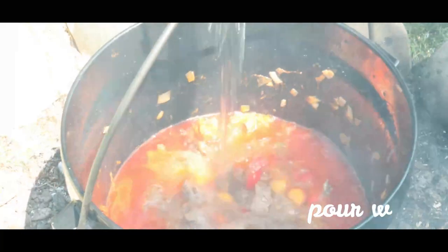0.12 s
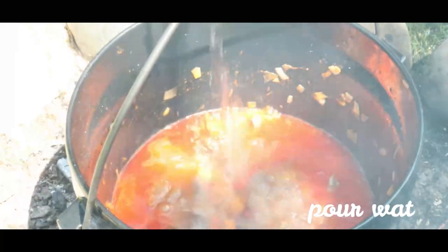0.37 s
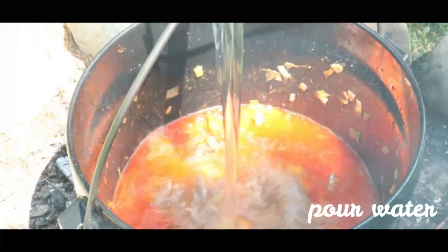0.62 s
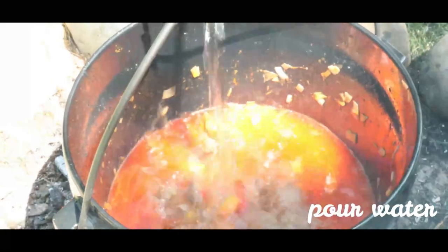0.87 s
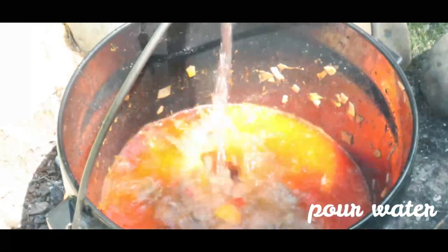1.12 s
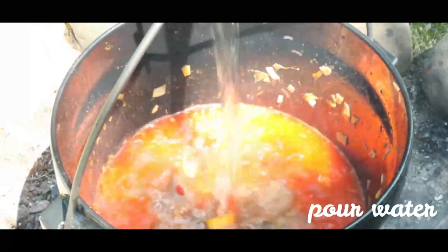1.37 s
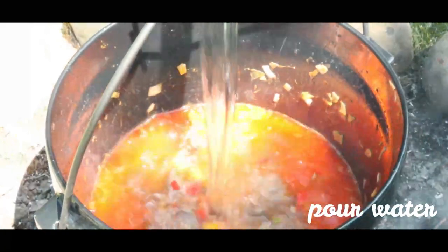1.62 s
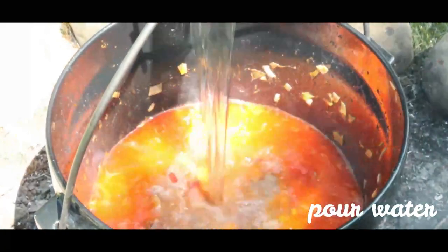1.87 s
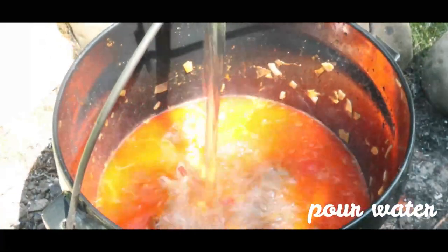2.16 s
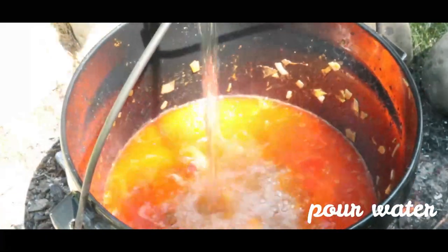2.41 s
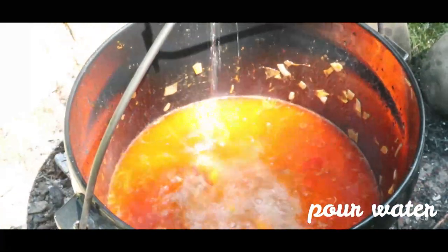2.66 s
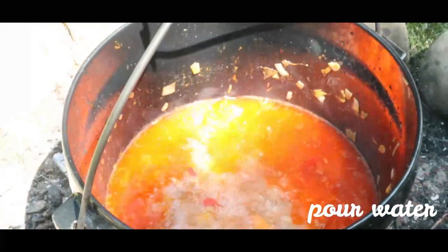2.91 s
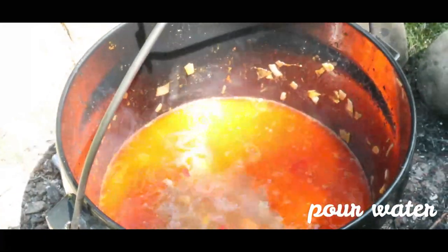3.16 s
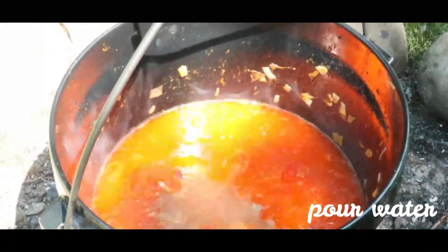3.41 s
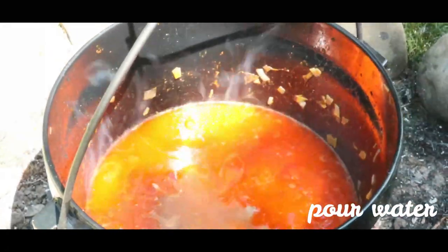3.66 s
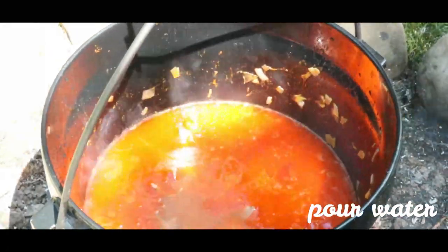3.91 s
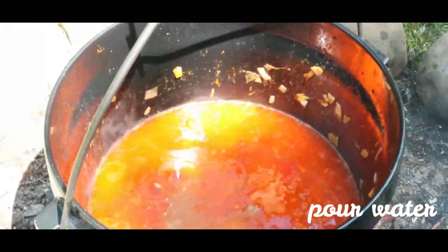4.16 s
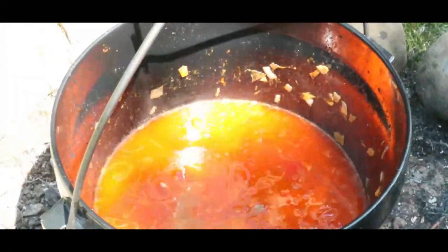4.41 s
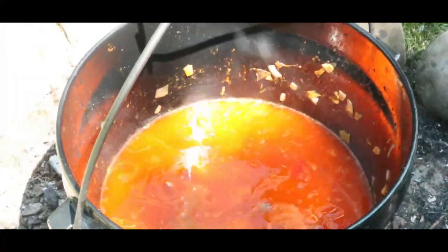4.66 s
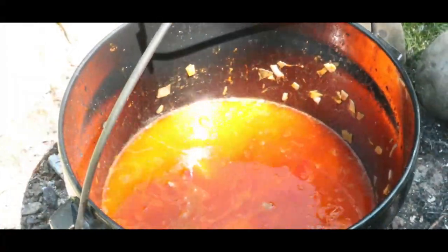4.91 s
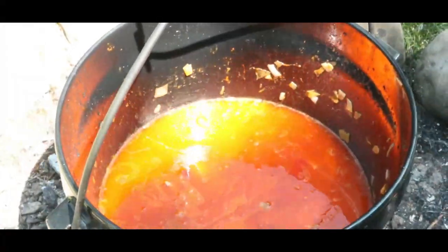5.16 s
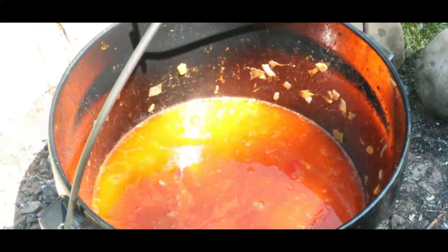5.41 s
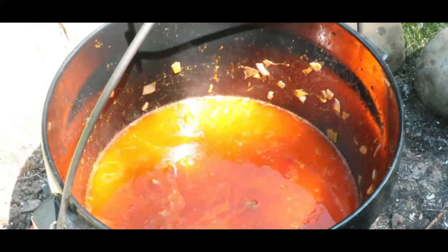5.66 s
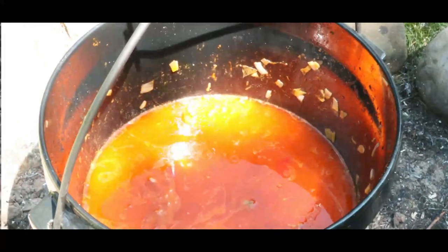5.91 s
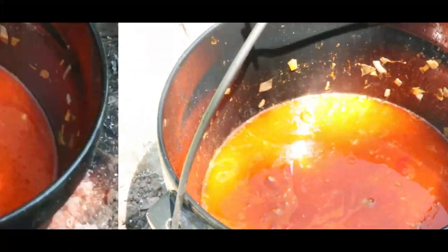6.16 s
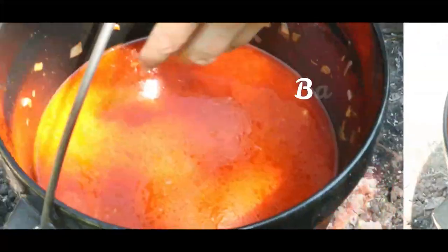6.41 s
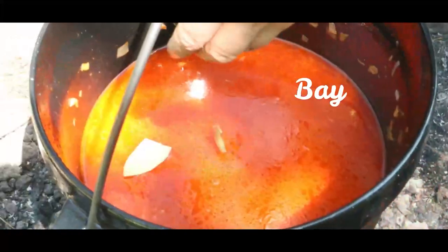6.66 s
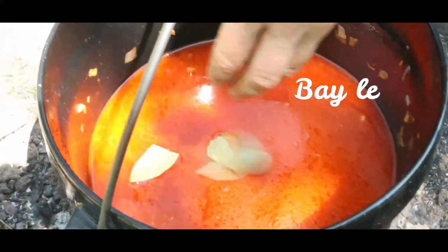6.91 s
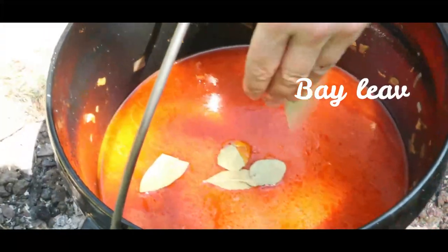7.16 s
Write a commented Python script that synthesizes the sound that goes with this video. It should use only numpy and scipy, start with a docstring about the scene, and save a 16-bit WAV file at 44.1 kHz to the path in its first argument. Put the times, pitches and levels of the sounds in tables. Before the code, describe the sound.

Close gurgling, splashing pour into a cauldron dwindles to drips by four seconds, followed by quiet open air with low wind and distant bird chirps.

```python
"""Water is poured into an iron pot outdoors, close by: an air pocket gulps, bubbles ring and spray ticks.
Deeper down, large bubbles glug and the pot hums; then the pour thins to drips. Rings are dying sines.
A noise suppressor shuts weak patches while the water runs, and the surroundings stay silent.
At 4.355 s they open up: coloured noise makes the wind and distant hum, gliding sines the small birds,
and a cloud of tiny rings a short rustle some way off."""
import sys
import numpy as np
from scipy import signal
from scipy.io import wavfile
from scipy.ndimage import uniform_filter1d

SR = 44100
rng = np.random.default_rng(int(sys.argv[2]) if len(sys.argv) > 2 else 0)


def level_to_linear(level):
    """Convert decibel levels to linear amplitude factors, elementwise."""
    exponent = np.asarray(level, float) / 20
    return 10 ** exponent


def generate_wav(sig):
    """Save sig (samples, or channels by samples) to the path in sys.argv[1] as 16-bit PCM at SR."""
    pcm = np.round(np.clip(np.atleast_2d(sig).T, -1, 1) * 32767).astype(np.int16)
    wavfile.write(sys.argv[1], SR, pcm)


N = 321930  # length in samples
AIR_OPENS_S = 4.355
HEAVE = 0.025  # rms share by which the heaving surface shifts the rings of the pot

# strength of the pour: [t/s, gulps level/dB, small bubbles level/dB, spray level/dB]
STREAM = [(0.16, -99, -100, -100), (0.24, -75, -81.5, -73), (0.5, -70.5, -68.5, -75.5),
          (0.56, -70.5, -62, -59.5), (0.74, -37, -42, -50), (0.83, -45.5, -53.5, -73),
          (0.95, -36.5, -46.5, -51), (1.09, -42.5, -57, -71.5), (1.33, -39, -54, -63.5),
          (1.42, -40.5, -55.5, -55), (1.63, -56, -52.5, -53.5), (1.92, -39.5, -53.5, -59),
          (2.19, -48, -61.5, -69), (2.38, -44, -55, -70), (2.62, -49.5, -66.5, -77),
          (2.95, -58.5, -62.5, -72), (3.2, -59, -64.5, -66.5), (3.4, -74, -85, -88), (3.6, -53.5, -74, -77),
          (3.76, -64.5, -89.5, -84.5), (3.95, -88, -90.5, -87.5), (4.08, -100, -105, -100)]
# moments when the stream breaks off: [t/s, length/s, level change/dB]
BREAKS = [(0.32, 0.046, -13), (0.4, 0.061, -11), (0.51, 0.031, -11.5), (1.71, 0.076, -20),
          (2.31, 0.05, -14), (2.68, 0.036, -8.5), (2.8, 0.096, -14), (2.94, 0.021, -13),
          (3.06, 0.079, -14.5), (3.4, 0.13, -4.5), (3.545, 0.1, -11.5)]
# single clear bubbles: [t/s, level/dB, f/Hz]
BUBBLES = [(0.278, -42.5, 2054), (0.354, -24.5, 3960), (0.435, -37.5, 1536), (0.546, -13.5, 1793),
           (0.587, -29, 3510), (0.598, -32, 1660), (0.666, -28, 1496), (0.688, -26.5, 3230),
           (0.691, -29, 1440), (0.725, -23.5, 1896), (0.737, -26.5, 1830), (0.78, -13.5, 2750),
           (0.854, -32, 2760), (0.908, -20.5, 3195), (0.943, -24, 2680), (0.888, -39, 895),
           (0.948, -29, 869), (0.977, -33.5, 890), (1.013, -35.5, 950), (1.033, -34, 895),
           (1.052, -28.5, 865), (1.069, -38, 860), (1.083, -39, 926), (1.106, -35, 943),
           (1.129, -34.5, 946), (1.164, -39.5, 894), (1.188, -35, 946), (1.208, -37, 880),
           (1.234, -29, 900), (1.293, -40, 900), (1.324, -45, 884), (1.421, -37.5, 950), (1.388, -27, 2910),
           (1.401, -25.5, 3350), (1.589, -38, 3480), (1.621, -36, 2490), (1.757, -42, 1010),
           (1.788, -35, 1790), (1.813, -32.5, 1530), (1.836, -24.5, 2860), (1.947, -37.5, 1670),
           (2.066, -38, 1530), (2.162, -36, 3740), (1.913, -31.5, 1094), (1.923, -31.5, 1004),
           (1.967, -29.5, 1000), (2.082, -40, 974), (2.129, -39.5, 973), (2.129, -28.5, 2840),
           (2.186, -35, 3020), (2.226, -40.5, 990), (2.268, -32.5, 1280), (2.267, -39, 790),
           (2.344, -31.5, 960), (2.365, -26.5, 3080), (2.399, -30.5, 2920), (2.41, -31, 3480),
           (2.446, -32, 1460), (2.477, -43.5, 1110), (2.49, -41.5, 1630), (2.532, -44, 1750),
           (2.579, -44.5, 1380), (2.622, -39, 1200), (2.714, -41.5, 3190), (2.827, -40.5, 1067),
           (2.832, -38.5, 2440), (2.848, -42, 1340), (2.875, -45.5, 1780), (2.895, -42.5, 2610),
           (2.965, -41.5, 1810), (3.079, -47, 2900), (3.123, -38.5, 2230), (3.123, -45.5, 1060),
           (3.1415, -42.5, 3210), (3.164, -32, 1155), (3.191, -42, 2780), (3.201, -42.5, 2380),
           (3.201, -42.5, 1148), (3.229, -38, 2470), (3.242, -41.5, 1690), (3.429, -49.5, 2860),
           (3.46, -47, 3120), (3.479, -43.5, 2900), (3.489, -41, 1153), (3.512, -43, 1120),
           (3.57, -31, 1290), (3.609, -32.5, 1524), (3.628, -36.5, 1514), (3.64, -25, 1485),
           (3.688, -46, 1140), (3.693, -46.5, 2330), (3.762, -56.5, 1240), (3.799, -48, 2680),
           (3.844, -48.5, 2494)]
# single clear splashes of spray: [t/s, level/dB, centre f/Hz]
SPLASHES = [(0.28, -33, 8350), (0.321, -32.5, 12300), (0.337, -32, 6300), (0.352, -22.5, 5540),
            (0.379, -31.5, 6460), (0.42, -25, 8020), (0.4432, -37.5, 4540), (0.527, -43, 6700),
            (0.535, -18.5, 7370), (0.5885, -20.5, 7370), (0.672, -27.5, 8550), (0.72, -30, 4840),
            (0.779, -27, 8500), (0.8486, -29.5, 9400), (0.9173, -20.5, 8000), (0.935, -16, 10400),
            (1.013, -23, 9900), (1.0521, -24, 6700), (1.125, -32.5, 4700), (1.3723, -21.5, 6350),
            (1.443, -34, 7600), (1.601, -21.5, 8860), (1.62, -23, 4730), (1.755, -30.5, 5020),
            (1.8162, -44, 13000), (1.8494, -26.5, 11700), (1.871, -27.5, 6730), (1.951, -33, 12200),
            (1.987, -29, 12000), (2.015, -24.5, 7900), (2.015, -22, 11960), (2.0691, -28, 7000),
            (2.2656, -27, 12200), (2.327, -28.5, 5560), (2.4367, -36.5, 11500), (2.5953, -40.5, 6180),
            (2.7128, -35.5, 5800), (2.741, -20, 9260), (2.839, -37.5, 4520), (2.9602, -36, 4620),
            (3.1124, -36, 4420), (3.1676, -20, 11200), (3.3428, -41, 7000), (3.399, -45, 6600),
            (3.453, -44.5, 4660), (3.4888, -35, 10700), (3.541, -46.5, 7000), (3.641, -40, 4780),
            (3.722, -41, 10240), (3.7635, -45, 4810), (3.789, -36, 7230), (3.859, -45, 5010),
            (3.9345, -40, 4850), (4.0184, -50.5, 4994)]
# broad rings of the air inside the pot: [f/Hz, width/Hz, level against the small bubbles/dB]
HOLLOW = [(1750, 50, -14), (2680, 68, -9), (3346, 99, -10.5), (4700, 36, -21.5)]
# colour of the open air: [f/Hz, relative level per Hz/dB]
AIR = [(88, -26.5), (150, -4), (201, -12.5), (317, -16), (682, -19), (2760, -31.5), (3770, -31.5),
       (7510, -37.5), (13800, -41), (15600, -40.5), (16500, -52)]


def stream():
    """The random part of the pour: air pocket, small bubbles and spray, landing in lumps."""
    lumps = evened(uniform_filter1d(rng.standard_normal(N), size=400))
    water = plunge() + level_to_linear(4.42 * lumps) * fizz() + level_to_linear(4.4 * lumps) * spray()
    t = np.arange(N) / SR
    return water * ((t > STREAM[0][0]) & (t < STREAM[-1][0]))


def plunge():
    """The air pocket under the stream gulps at a nearly even pace, each time at its own pitch."""
    # pitch of the air pocket: [t/s, f/Hz]
    pocket = [(.6, 948), (.95, 898), (1.5, 906), (1.95, 1006), (2.6, 1098), (3.5, 1151), (3.66, 1479),
              (3.78, 1452), (3.84, 1208)]
    median_gap_s, gap_jitter = 1 / 50, 0.35
    hz = column(pocket, index=1)
    level_db = column(STREAM, index=1) + humps(BREAKS)
    draws = rng.standard_normal((250, 3))
    times = np.cumsum(np.exp(gap_jitter * draws[:, 0])) * median_gap_s
    out = np.zeros(N)
    for s, (_, size, db) in zip(times, draws):
        at = round(s * SR)
        add(out, s, level_to_linear(level_db[at] + 2.9 * db) * gulp(hz[at] * (1 + 0.04 * size)))
    # between the gulps the pocket rings on, 12 dB down
    return out + level_to_linear(level_db - 12) * rung(hz, 70, 260, spread_db=3.5, soft=0.033)


def gulp(hz):
    """A round, short ring of an air pocket, peak 1."""
    sound = ring(hz, 26 / hz, 2.2 / hz, 0.025)
    return sound / abs(sound).max()


def fizz():
    """Small bubbles ring at many pitches and excite the air inside the pot."""
    # colour of the small bubbles: [f/Hz, relative level per Hz/dB]
    bubble_colour = [(710, -36), (1200, 2.5), (1740, -9), (1880, -12), (2010, -3), (2300, -7.5),
                     (2700, -4.5), (3390, -7), (4200, -26), (5460, -50), (9240, -120)]
    hollow = np.zeros(N)
    for hz, width, db in HOLLOW:
        hollow += level_to_linear(db) * rung(hz * wander(HEAVE), width, 300, spread_db=5.5, soft=0.39)
    level = level_to_linear(column(STREAM, index=2) + humps(BREAKS))
    # each clear bubble leaves small ones behind
    level = np.sqrt(level ** 2 + stirred(BUBBLES, after_db=-29, t60=0.043))
    return level * (grains(bubble_colour, 1000, cycles=41, spread_db=4.5, glide=0.0097) + hollow)


def spray():
    """Fine bright rings, with droplets that crack without ringing."""
    # colour of the spray: [f/Hz, relative level per Hz/dB]
    spray_colour = [(2240, -36.5), (3800, -7.5), (4650, 0.5), (5100, -4.5), (5530, -1), (9040, -8.5),
                    (10600, -9.5), (15100, -16), (16500, -31)]
    level = level_to_linear(column(STREAM, index=3) + humps(BREAKS))
    # each splash leaves spray falling
    level = np.sqrt(level ** 2 + stirred(SPLASHES, after_db=-33, t60=0.21))
    ringing = grains(spray_colour, 2200, cycles=46, spread_db=6.0, glide=0.041)
    return level * (ringing + level_to_linear(-10) * patter())


def patter(count=8, per_s=120):
    """Scattered droplets, each a crack over the treble, drawn from a few shapes."""
    out = np.zeros(N)
    for shape in crack(rng.standard_normal((count, 150))):
        out += signal.oaconvolve(clicks(per_s / count, spread_db=4.5), shape)[:N]
    treble = signal.butter(2, [3800, 13000], "band", fs=SR, output="sos")
    return evened(signal.sosfilt(treble, out))


def drops():
    """Clear bubbles and splashes, each with a cluster of smaller neighbours."""
    out = np.zeros(N)
    for s, db, hz in BUBBLES:
        # low ones are round gulps, high ones ring longer in cycles
        bubble = gulp(hz) if hz < 1060 else ring(hz, 48 / hz, 1.5 / hz, 0.021)
        add(out, s, level_to_linear(db) * bubble)
        add(out, s, cluster(db - 15.5, 900, span=4.3, t60=0.017, spread_s=0.0072))
    for s, db, hz in SPLASHES:
        shorter = (5000 / hz) ** 2  # higher splashes are shorter by the square of pitch
        add(out, s, level_to_linear(db) * ring(hz, 0.010 * shorter, 0.0005 * shorter, 0.011))
        add(out, s, level_to_linear(db - 11) * crack(rng.random(150)))  # the splash hits the surface
        add(out, s, cluster(db - 13.5, 4770, span=4.7, t60=0.014, spread_s=0.003))
    return out


def cluster(db, low_hz, span, t60, spread_s):
    """The tiny bubbles of many sizes that a landing drop shakes loose; later ones are weaker."""
    sound = np.zeros(SR // 10)
    for late, size in rng.random((6, 2)):
        tiny = ring(low_hz * span ** size, t60, t60 / 16, 0.052)
        add(sound, spread_s * late, level_to_linear(db - 9.7 * late) * tiny)
    return sound


def depths():
    """Deep down large bubbles glug at a wandering pitch and the pot hums."""
    # strength deep in the pot: [t/s, glugs level/dB, hum level/dB]
    deep_levels = [(0.85, -100, -94), (1.0, -91, -86.5), (1.52, -59.5, -74), (1.85, -75, -78),
                   (2.0, -60.5, -87.5), (2.2, -71.5, -83), (2.4, -71.5, -66), (2.63, -83, -78),
                   (2.93, -82.5, -90.5), (3.4, -91.5, -100), (3.6, -85, -100), (3.8, -102, -102)]
    # sizes of the large bubbles: [f/Hz, width/Hz, relative level/dB]
    gurgle = [(480, 43.6, -3), (409, 40, -7), (740, 67, -1)]
    pitch_wander = 0.057  # rms share
    glugs = np.zeros(N)
    for hz, width, db in gurgle:
        glugs += level_to_linear(db) * rung(hz * wander(pitch_wander), width, 80, spread_db=3.5, soft=0.12)
    hum = rung(320 * wander(pitch_wander), 24, 60, spread_db=3, soft=0.005)
    deep = level_to_linear(column(deep_levels, index=1)) * glugs + level_to_linear(column(deep_levels, index=2)) * hum
    return signal.sosfilt(signal.butter(4, 240, "high", fs=SR, output="sos"), deep)


def plops():
    """Slow, round rings of single large bubbles deep down."""
    # single large bubbles: [t/s, level/dB, f/Hz]
    large_bubbles = [(0.947, -50, 740), (1.121, -39.5, 704), (1.366, -43, 610), (1.483, -41, 507),
                     (1.543, -45, 464), (1.601, -39.5, 484), (2.342, -40.5, 730), (2.48, -40, 748),
                     (2.578, -46.5, 742), (2.63, -44, 740), (2.755, -64.5, 311), (3.165, -58, 629),
                     (3.345, -67, 644)]
    out = np.zeros(N)
    for s, db, hz in large_bubbles:
        add(out, s, level_to_linear(db) * ring(hz, 40 / hz, 3.6 / hz, 0.018))
    return out


def pot(x):
    """The air inside rings on as the surface heaves; iron walls echo, dull in both ears, bright in each."""
    air = np.zeros(N)
    for hz, width, db in HOLLOW:
        # shift the resonance to 0 Hz, smooth there, shift back
        turn = np.exp(2j * np.pi * np.cumsum(hz * wander(HEAVE)) / SR)
        r = np.exp(-np.pi * width / SR)
        air += 2 * (turn * signal.lfilter([1 - r], [1, -r], x / turn)).real
    x = x + air
    dull = signal.lfilter([0.4], [1, -0.6], echoes(0.14))
    bright = np.gradient([echoes(0.026), echoes(0.025)], axis=1)
    walls = level_to_linear(-10.5) * dull + level_to_linear(-11) * bright
    both = x + signal.fftconvolve(x[None], walls, axes=1)[:, :N]
    return np.array([both[0], np.append(0, both[1, :-1])])  # the right ear is one sample further off


def echoes(t60):
    """Sparse taps of random sign that die away, energy 1."""
    t = np.arange(SR // 8) / SR
    signs = rng.choice([-1., 1.], len(t))
    taps = signs * (rng.random(len(t)) < 0.06) * level_to_linear(-60 * t / t60) * (t > 0.001)
    return taps / np.linalg.norm(taps)


def thumps():
    """Short low pushes of wind on the microphone, sine bursts that are stronger on the left."""
    # pushes of wind: [t/s, level before the left-right offset/dB, f/Hz, length/s]
    pushes = [(0.539, -62, 49.5, 0.017), (1.945, -54, 39.7, 0.031), (3.785, -47, 40.14, 0.072)]
    out = np.zeros(N)
    for s, db, hz, length in pushes:
        t = np.arange(int(length * SR)) / SR
        add(out, s, level_to_linear(db) * np.sin(2 * np.pi * hz * t) * np.sin(np.pi * t / length) ** 2)
    return out * level_to_linear([[2.5], [-3.5]])


def outdoors():
    """Wind on the microphone, distant hum, a rustle and birds, faded in together within 14 ms."""
    # likeness of left and right: [f/Hz, correlation]
    likeness = [(60, 0.25), (180, 0.29), (550, 0.38), (1650, 0.52), (4970, 0.071), (15000, 0.0)]
    # colour of the wind: [f/Hz, relative level per Hz/dB]
    wind_colour = [(8.8, -35), (15, -5.5), (54, 4), (91, -5.5), (123, -12.5), (162, -14), (210, -24.5),
                   (339, -35), (400, -28.5), (520, -71), (880, -120)]
    # gusts: [t/s, level rise/dB]
    gust_rises = [(4.45, 4), (5.172, 3), (5.439, 6.5), (6.69, 7), (6.97, 7), (7.221, 8.5)]
    gusts = humps([(s, 0.1, db) for s, db in gust_rises])
    tilt_db = np.array([[0.8], [-0.8]])  # the wind is stronger on the left
    wind = level_to_linear(-51 + gusts + tilt_db) * noise(wind_colour, likeness, 1.0, size=2048)
    air = level_to_linear(-66) * noise(AIR, likeness, 1.42, size=1024)
    fade_in = np.clip((np.arange(N) / SR - AIR_OPENS_S) / 0.014, 0, 1)
    return (wind + air + birds() + rustle()) * fade_in


def noise(colour, same, patchy_db, size):
    """Two-channel noise of a given colour and likeness, with drifting patches, rms 1."""
    hz = np.fft.rfftfreq(size, 1 / SR)
    a, b, c, d, patches = rng.standard_normal((4 * N // size + 5, len(hz), 5)).T
    patches = uniform_filter1d(uniform_filter1d(patches, size=10, axis=0), size=10, axis=1)
    like = np.clip(read(same, hz), -1, 1)[:, None]
    left = a + 1j * b
    right = like * left + np.sqrt(1 - like ** 2) * (c + 1j * d)
    level_db = read(colour, hz)[:, None] + patchy_db * evened(patches)
    z = np.array([left, right]) * level_to_linear(level_db)
    return evened(signal.istft(z, nperseg=size, noverlap=size * 3 // 4)[1][:, :N])


def birds():
    """Calls in two voices and single gliding notes, blurred by distance."""
    # two-voiced calls that rise to a held pitch: [t/s, length/s, start f/Hz, level before the blur/dB]
    calls = [(4.493, 0.072, 5430, -75), (5.424, 0.14, 3860, -74), (5.653, 0.063, 5500, -75.5),
             (6.055, 0.16, 3850, -72), (6.571, 0.17, 3810, -70), (7.208, 0.11, 4700, -75)]
    # single notes: [t/s, length/s, start f/Hz, end f/Hz, level before the blur/dB]
    notes = [(4.569, 0.15, 7100, 5560, -69), (4.616, 0.046, 4180, 5400, -71),
             (4.661, 0.064, 6940, 6770, -68), (4.759, 0.065, 6760, 5290, -65.5),
             (4.863, 0.13, 2300, 2434, -71), (4.888, 0.046, 5990, 5480, -67),
             (5.16, 0.067, 3134, 3400, -70.5), (5.256, .09, 4050, 4380, -73.5),
             (5.289, 0.071, 4980, 5170, -72.5)]
    low_hz, high_from_hz, high_hz, glide_s = 5800, 5900, 7000, 0.028
    out = np.zeros(N)
    for s, length, from_hz, db in calls:
        left = np.exp(-np.arange(int(length * SR)) / SR / glide_s)  # share of the glide still to go
        add(out, s, whistle(low_hz + (from_hz - low_hz) * left, db))
        add(out, s + 0.15 * length, whistle(high_hz + (high_from_hz - high_hz) * left, db))
    for s, length, from_hz, to_hz, db in notes:
        add(out, s, whistle(np.linspace(from_hz, to_hz, int(length * SR)), db))
    t = np.arange(SR // 4) / SR
    echo = rng.standard_normal((2, len(t))) * level_to_linear(-60 * t / 0.4)
    echo /= np.linalg.norm(echo[0])
    return 0.7 * out + 0.85 * signal.fftconvolve(out[None], echo, axes=1)[:, :N]


def whistle(hz, db):
    """A wavering sine along the pitch hz, with a quick rise and a rounded fall."""
    waver = evened(uniform_filter1d(rng.standard_normal(SR // 4), size=120))[:len(hz)]
    t = np.arange(len(hz)) / SR
    swell = np.minimum(t / 0.0094, 1) * np.sqrt(np.cos(np.pi / 2 * t / t[-1]) + 1e-9)
    return level_to_linear(db) * np.sin(2 * np.pi * np.cumsum(hz + 105 * waver) / SR) * swell


def rustle(start_s=5.87, length_s=0.23, db=-69):
    """A short grainy rustle some way off: tiny rings, thickest near one pitch."""
    out = np.zeros(N)
    for late, size in rng.random((90, 2)):
        hz = 2150 * np.exp(3 * (size - 0.5) ** 3 + 0.15 * size)
        add(out, start_s + length_s * late, np.sin(np.pi * late) * ring(hz, 0.055, 0.0011, 0.0064))
    return level_to_linear(db) * out


def ring(hz, t60, rise, glide):
    """A dying sine with a soft start whose pitch climbs as the bubble nears the surface."""
    t = np.arange(int(t60 * SR) + 50) / SR
    swell = level_to_linear(-60 * t / t60) * (1 - np.exp(-t / rise))
    return swell * np.sin(2 * np.pi * hz * t * (1 + glide * t / t60))


def crack(draw):
    """A short burst of bright noise: differences of random draws, dying within 0.25 ms to 1/e."""
    burst = np.diff(draw, axis=-1)
    return burst * np.exp(-np.arange(burst.shape[-1]) / SR / 0.00025)


def clicks(per_s, spread_db):
    """A sparse train of random sign and size."""
    at = np.flatnonzero(rng.random(N) < per_s / SR)
    chance = rng.random((len(at), 2))
    train = np.zeros(N)
    size_db = spread_db * np.minimum(-np.log(1 - chance[:, 0]), 3.3)
    train[at] = level_to_linear(size_db) * np.sign(chance[:, 1] - 0.5)
    return train


def grains(colour, per_s, cycles, spread_db, glide, count=28):
    """Bubbles of many sizes, each size with its own train, as loud as the colour says, rms 1."""
    out = np.zeros(N)
    pitches = np.geomspace(colour[1][0], colour[-2][0], count) * rng.uniform(0.96, 1.03, count)
    for hz in pitches:
        shape = ring(hz, cycles / hz, 3.1 / hz, glide)
        train = clicks(per_s / count, spread_db)
        out += hz * level_to_linear(read(colour, hz)) * signal.oaconvolve(train, shape)[:N]
    return evened(out)


def rung(hz, width, per_s, spread_db, soft):
    """Scattered blows with a soft start ring a resonance that follows the pitch hz, rms 1."""
    turn = np.exp(2j * np.pi * np.cumsum(hz * np.ones(N)) / SR)
    r = np.exp(-np.pi * width / SR)
    blows = clicks(per_s, spread_db) * np.exp(2j * np.pi * rng.random(N))
    low = signal.lfilter([1 - r], [1, -r], blows)  # the decay, before it is turned up to pitch
    return evened((turn * signal.lfilter([soft], [1, soft - 1], low)).real)


def stirred(rows, after_db, t60):
    """The power that each landing drop leaves behind, dying away."""
    kicks = np.zeros(N)
    for s, db, hz in rows:
        kicks[round(s * SR)] += level_to_linear(db + after_db) ** 2
    t = np.arange(SR // 2) / SR
    decay = level_to_linear(-60 * t / t60) ** 2 * np.minimum(t / 0.0072, 1)
    return abs(signal.oaconvolve(kicks, decay)[:N])


def wander(share):
    """A slow random drift around 1, share being its rms."""
    drift = uniform_filter1d(uniform_filter1d(rng.standard_normal(N), size=3000), size=3000)
    return 1 + share * evened(drift)


def humps(rows):
    """Smooth rises or dips in dB from rows (s, length s, dB)."""
    t = np.arange(N) / SR
    return sum(db * np.exp(-(2 * (t - s) / length) ** 2) for s, length, db in rows)


def column(rows, index):
    """One column of a curve at every sample."""
    rows = np.array(rows)
    return np.interp(np.arange(N) / SR, rows[:, 0], rows[:, index])


def read(points, hz):
    """Reads a spectrum on a log-frequency axis."""
    f, value = np.transpose(points)
    return np.interp(np.log(hz + 1), np.log(f + 1), value)


def evened(x):
    """Scales to rms 1."""
    return x / np.sqrt(np.mean(x ** 2) + 1e-20)


def add(mix, s, sound):
    """Mixes a sound in at time s."""
    part = mix[round(s * SR):][:len(sound)]
    part += sound[:len(part)]


def scene():
    """Water in the pot, then the open air."""
    no_bass = signal.butter(4, 700, "high", fs=SR, output="sos")  # small bubbles radiate no bass
    water = signal.sosfilt(no_bass, stream() + drops()) + depths() + plops()
    return pot(water) + thumps() + outdoors()


def band_limit(x):
    """A steep low-pass at the top of the band."""
    return signal.sosfilt(signal.butter(12, 16450, fs=SR, output="sos"), x)


def record(dry):
    """While the water runs a suppressor shuts every weak patch of the short-time spectrum."""
    hz, t, z = signal.stft(dry, SR, nperseg=1024, noverlap=768)
    power = (abs(z) ** 2).mean(0)
    power = uniform_filter1d(uniform_filter1d(power, size=9, axis=0), size=4, axis=1)
    # the threshold is shaped like the colour of the air, level below 1500 Hz
    threshold_db = -67.5 + read(AIR, np.maximum(hz, 1500))[:, None]
    over_db = 10 * np.log10(abs(power) + 1e-20) - threshold_db
    gate = level_to_linear(np.clip(1.5 * over_db, -25, 0)) * (hz < 16200)[:, None]
    gain = np.where(t < AIR_OPENS_S - 0.03, gate, 1)
    mix = signal.istft(z * gain, SR, nperseg=1024, noverlap=768)[1][:, :N]
    return band_limit(mix)


dry = scene()
out = record(dry)
generate_wav(out)
```